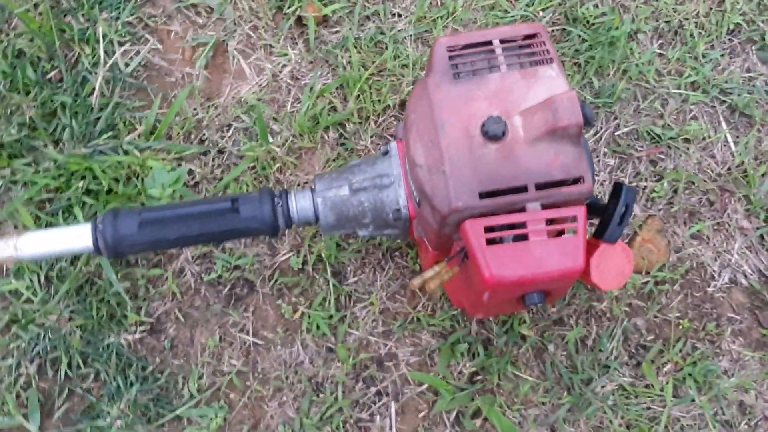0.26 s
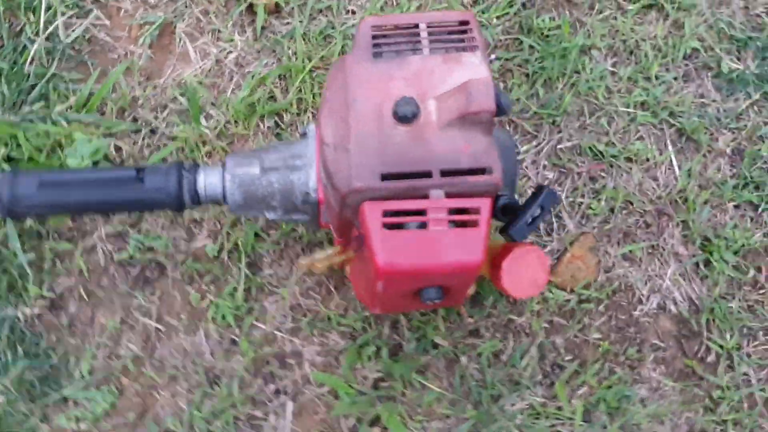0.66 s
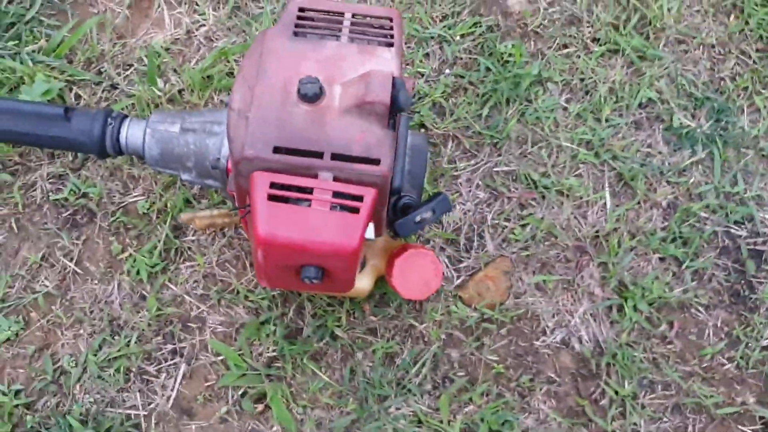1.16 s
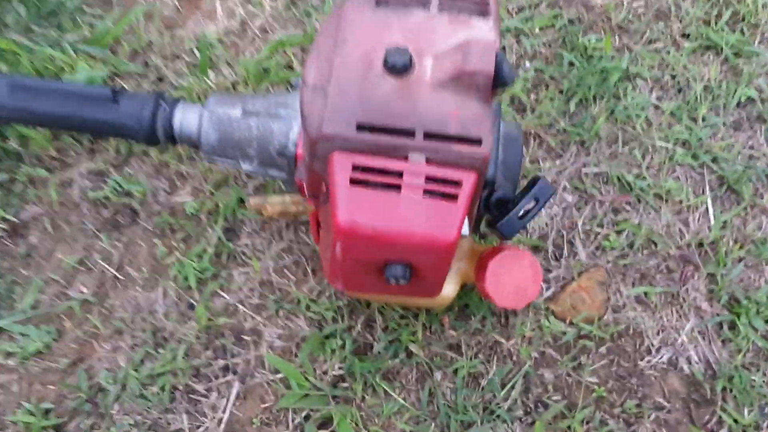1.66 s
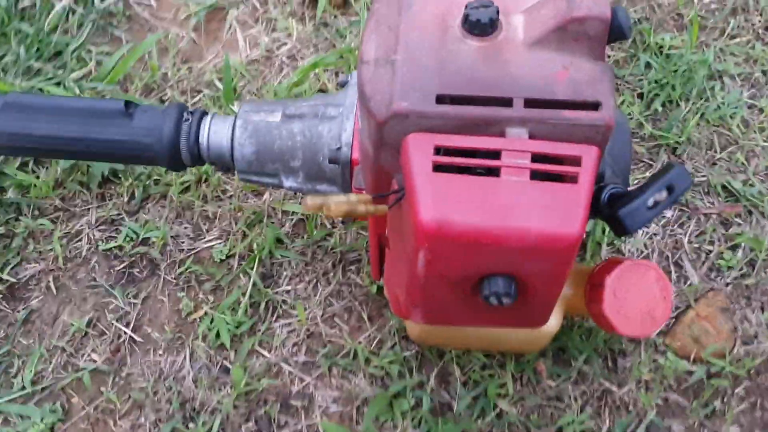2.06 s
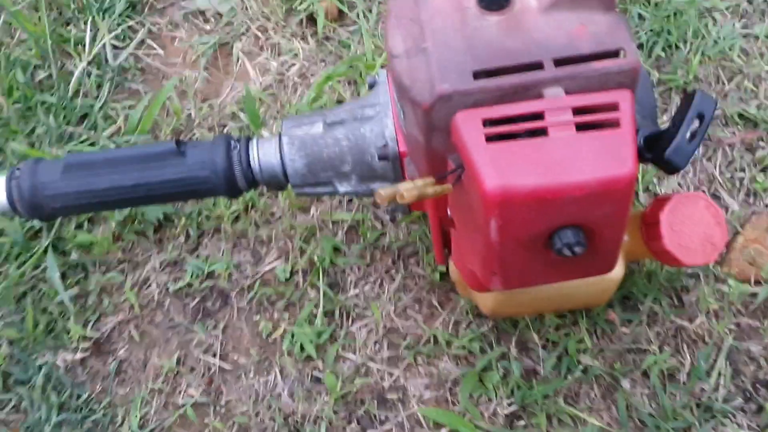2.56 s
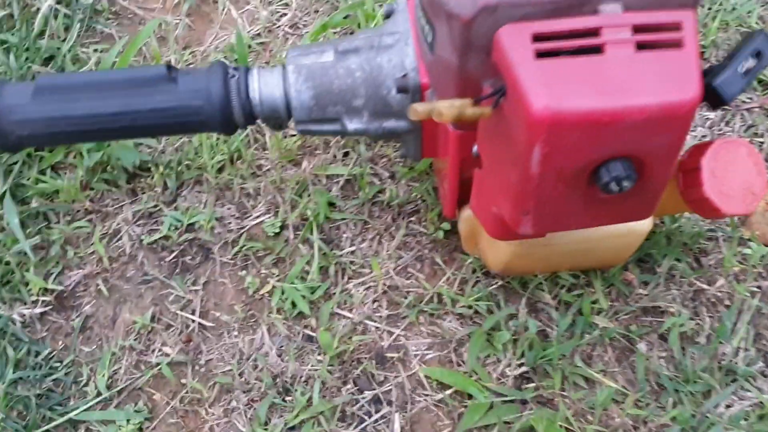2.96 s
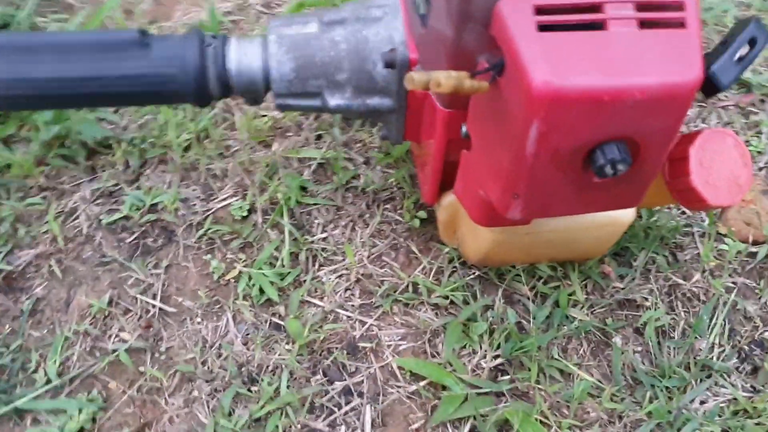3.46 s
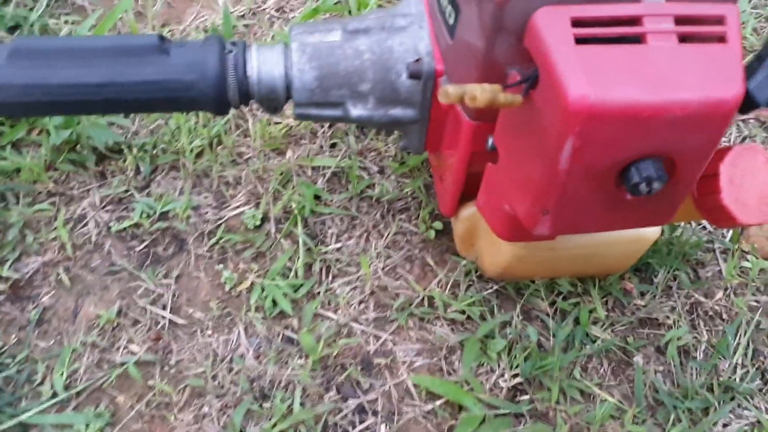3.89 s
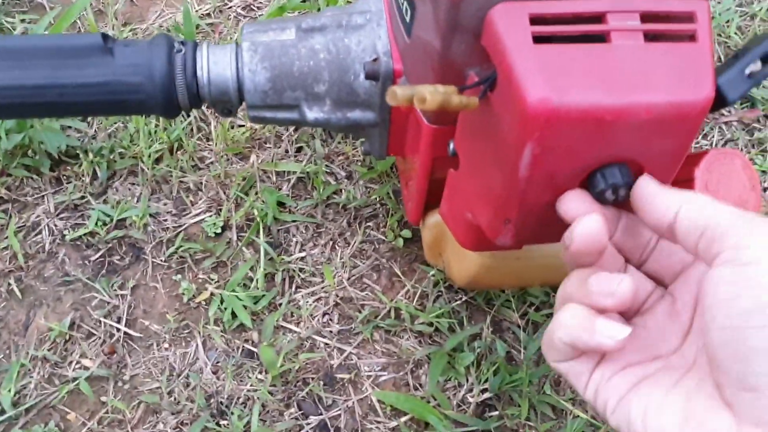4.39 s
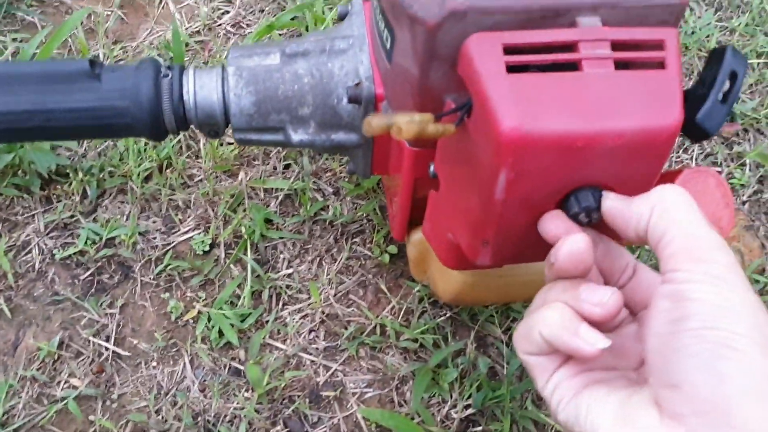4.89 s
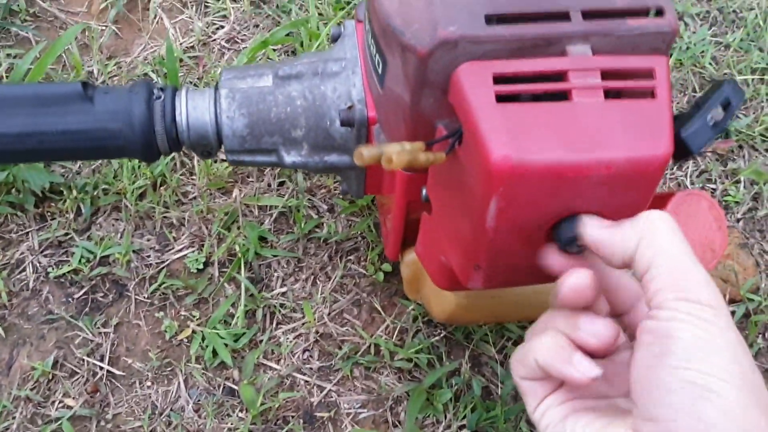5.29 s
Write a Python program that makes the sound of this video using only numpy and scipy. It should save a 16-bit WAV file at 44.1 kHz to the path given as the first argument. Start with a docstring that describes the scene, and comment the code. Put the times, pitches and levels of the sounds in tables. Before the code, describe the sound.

A small two-stroke brush cutter idles on grass outdoors, running from start to end. About 45 soft low exhaust puffs a second form a fluttering purr, while every few turns a charge fires with a hard, cracking pop and brief metallic ring. Fan rasp, piston slap and loose plastic rattle throughout. The handheld stereo microphone moves very close, from above the engine to beside the air filter, making the clatter stronger.

```python
"""Two-stroke brush cutter idling

A small engine idles on the grass while the microphone moves from above its cover to beside the air filter.
Each of about 45 turns a second pumps a soft puff through the muffler, but only every few turns does the
charge fire: a sharp bang that cracks through the casing, rings the cylinder fins and kicks the crank.
Pulses placed turn by turn make the exhaust, decaying sines the fins, and shaped noise the fan, intake,
piston slap, loose cover and shroud. A bounce off the ground colours it all."""
import sys
import numpy as np
from scipy import signal
from scipy.fft import rfft, irfft, next_fast_len
from scipy.io import wavfile

SR = 44100
rng = np.random.default_rng(int(sys.argv[2]) if len(sys.argv) > 2 else 0)


def inscribe(sig):
    """Save sig as 16-bit PCM at rate SR to the path in sys.argv[1].

    A 1-D sig is mono; a 2-D sig holds one channel per row.
    Samples are clipped to [-1, 1] before scaling.
    """
    pcm = np.round(np.clip(np.atleast_2d(sig).T, -1, 1) * 32767)
    wavfile.write(sys.argv[1], SR, pcm.astype(np.int16))


N = 244314
SECONDS = np.arange(N) / SR
IDLE_HZ = 45.3  # nominal crank turns per second


def amp(db):
    """Decibels to gain."""
    return 10 ** (np.asarray(db) / 20)


def unit(x):
    """Scale to rms 1."""
    return x / np.sqrt(np.mean(x ** 2) + 1e-20)


def along(points, hz):
    """Read (frequency, value) points on a log frequency axis."""
    f, v = np.transpose(points)
    return np.interp(np.log(hz + 1), np.log(f + 1), v)


def filtered(x, response):
    """Multiply the spectrum of x by a response given as a function of frequency."""
    size = next_fast_len(N + SR // 2)
    return irfft(rfft(x, size) * response(np.fft.rfftfreq(size, 1 / SR)), size)[..., :N]


def strike(times, sizes, shape):
    """Place one scaled copy of a shape at each time."""
    # a second of lead-in leaves room for times before zero
    train = np.bincount(np.round(times * SR).astype(int) + SR, sizes, N + SR)
    return signal.fftconvolve(train, shape)[SR:SR + N]


def burst(t, attack, t60):
    """An envelope that rises from t = 0 and dies away by 60 dB in t60 seconds."""
    t = np.maximum(t, 0)
    return (1 - np.exp(-t / attack)) * amp(-60 * t / t60)


# Likeness of the two channels of every noise: (frequency [Hz], left-right correlation [-1 to 1])
STEREO_LIKENESS = [(40, 1), (200, 1), (1000, 0.84), (2000, 0.98), (4000, 0.24), (8000, 0.15), (14000, 0.17)]


def noise(spectrum):
    """Stereo noise of rms 1, alike in the bass and mostly unrelated in the high treble."""
    def mid_side(hz):
        angle = np.arccos(np.clip(along(STEREO_LIKENESS, hz), -1, 1)) / 2
        return amp(along(spectrum, hz)) * [np.cos(angle), np.sin(angle)]

    mid, side = filtered(rng.standard_normal((2, N)), mid_side)
    return unit(np.array([mid + side, mid - side]))


# The microphone's move: (time [s], puff level [dB], clatter level [dB],
# nearness to the air filter [0-1], extra path of the ground bounce [m])
MICROPHONE_MOVE = [(0, -1.5, -2, 0.38, 0.31), (1.2, -1.5, -1, 0, 0.18), (1.8, 1, 0, 0, 0.22),
                   (2.1, 1.5, 1, 0.73, 0.21), (2.6, -1.5, 2, 0.92, 0.14), (3.3, 0.5, 2.5, 0.97, 0.15),
                   (3.9, -0.5, 1.5, 0.99, 0.13), (4.6, 0, 2, 0.96, 0.19), (5.5, -0.6, 2.5, 1, 0.13)]


def microphone(times):
    """Puff level, clatter level, nearness and extra ground path at these times."""
    s, *columns = np.transpose(MICROPHONE_MOVE)
    return [np.interp(times, s, column) for column in columns]


# Firings at set times, hard and ordinary: (time [s], hardness over a 0 dB firing [dB])
TIMED_FIRINGS = [(0.2113, 5.5), (0.2764, 6.5), (0.5195, 2), (0.5885, 7.5), (0.6553, 4), (0.945, 7),
                 (1.0308, 5), (1.3632, 8.5), (1.4508, 10), (1.5326, 6.5), (1.9271, 3.5), (2.065, 4.5),
                 (2.1379, 7), (2.2317, 9), (2.3187, 10.5), (2.426, 3), (2.7764, 9.5), (3.0379, 2.5),
                 (3.3475, 8), (3.4305, 8), (3.4946, 6), (3.6987, 6), (3.7848, 9.5), (4.0512, 6),
                 (4.4515, 11.5), (4.5547, 6.5), (4.7956, 8.5), (4.9002, 10), (5.005, 3), (5.332, 8),
                 (5.5045, 5.5)]
# How well the cold mixture burns, with two stumbles: (time [s], mean hardness of the other firings [dB])
MIXTURE_QUALITY = [(0.14, -11), (0.37, 3), (0.88, 0), (1.29, -37), (1.7, 0), (1.8, 6.5), (2.72, 5),
                   (2.95, -20), (3.1, 9), (3.62, -3), (3.95, -1.5), (4.4, 9.5), (5.5, 6)]
# turns a fresh charge needs, its growth per second as the engine warms, turns before the first timed firing
FLUSH_TURNS, FLUSH_TURNS_PER_S, COAST_TURNS = 3.13, .13, 9


def ignite(scatter_db, bang_share, bang_offset_db):
    """Firings as (time [s], bang [dB], ring [dB]): a charge lights once enough turns flush the cylinder."""
    rows, start = [], TIMED_FIRINGS[0][0] - COAST_TURNS / IDLE_HZ
    for end, timed_db in TIMED_FIRINGS:
        turns = round((end - start) * IDLE_HZ)
        charges = max(1, round(turns / (FLUSH_TURNS + FLUSH_TURNS_PER_S * start)))
        lit = np.ceil(np.arange(1, charges) * turns / charges - .5)  # nearest whole turn
        times = start + (end - start) * lit / turns
        hardness = np.interp(times, *np.transpose(MIXTURE_QUALITY))
        hardness = hardness + scatter_db * rng.standard_normal(len(times))
        rows += [*zip(times, hardness), (end, timed_db)]
        start = end
    s, ring_db = np.transpose(rows)
    return np.transpose([s, bang_offset_db + bang_share * ring_db, ring_db])


def crank(firings, slowing):
    """Times of all turns and which fire: after each kick the crank coasts, each turn a little longer."""
    fired = firings[:, 0]
    # four turns lead in to the first firing and four follow the last
    kicks = np.r_[fired[0] - 4 / (IDLE_HZ + 3), fired, fired[-1] + 4 / IDLE_HZ]
    turns = []
    for start, end in zip(kicks, kicks[1:]):
        lengths = 1 + slowing * np.arange(max(1, round((end - start) * IDLE_HZ)))
        turns.extend(start + (end - start) * (np.cumsum(lengths) - lengths) / lengths.sum())
    return np.array(turns), np.isin(turns, fired)


def crank_angle(turns):
    """Crank position at every sample, counted in turns."""
    return np.interp(SECONDS, turns, np.arange(len(turns)))


def rumble():
    """Turbulent gas adds a faint low rush."""
    # (frequency [Hz], relative level [dB])
    rush = [(20, -35), (35, -15), (50, -6), (110, 0), (200, 0), (400, -7), (800, -20), (3000, -60)]
    return amp(-34) * noise(rush)


# Narrow resonances of the shroud: (frequency [Hz], relative level [dB per Hz])
SHROUD_TONES = [(2900, -45), (3200, -16), (3279, 0), (3360, -16), (3520, -28), (3700, -16), (3758, 2),
                (3820, -16), (4200, -45)]


def shroud(shroud_db):
    """Constant vibration keeps the engine shroud singing faintly: noise in narrow bands."""
    return amp(shroud_db) * noise(SHROUD_TONES)


def shake(turns, shake_db, lag):
    """The unbalanced piston rocks the whole machine: one sine cycle per turn, lag in turns."""
    return amp(shake_db) * np.sin(2 * np.pi * (crank_angle(turns) - lag))


# Clatter colour from above the cover: (frequency [Hz], relative level [dB per Hz])
CLATTER_ABOVE = [(100, 4), (400, 10.5), (800, -2), (1060, 7), (1500, -2.5), (1870, 6), (2800, 0),
                 (3750, 2.5), (5000, -0.5), (7400, -1), (8050, 3), (9300, -15), (12000, -13), (15500, -26)]
# Clatter colour from beside the air filter: (frequency [Hz], relative level [dB per Hz])
CLATTER_BESIDE = [(100, 18.5), (400, 4.5), (850, 2), (1350, 9), (1600, -0.5), (2000, 4), (2700, 0.5),
                  (4300, 6), (5100, -2.5), (6700, -1), (7350, 3), (9600, -15), (10900, -10), (15500, -30)]
# Rise and fall of the rasp within one turn: (share of the turn [0-1], level [dB])
RASP_TURN = [(0, 4.5), (.1, 1), (.22, -2.5), (.35, -4.5), (.42, 1.5), (.55, 4.5), (.75, 2.5), (.88, 1.5),
             (1, -6.5)]


def clatter(turns, clatter_db, uneven_db, slap_db, slap_t60, tick_db, tick_t60, count=800):
    """Fan and intake rasp with the crank, the piston slaps once a turn, loose parts tick at random."""
    angle = crank_angle(turns)
    _, level_db, near, _ = microphone(SECONDS)
    near = np.clip(near, 0, 1)

    knots = np.linspace(0, len(turns), 6 * len(turns))  # about six random levels a turn
    uneven = np.interp(angle, knots, rng.standard_normal(len(knots)))
    rasp = amp(np.interp(angle % 1, *np.transpose(RASP_TURN)) + uneven_db * uneven)

    t = SECONDS[:SR // 20]
    late, force = rng.standard_normal((2, len(turns)))
    slap_times = turns + 0.00637 + 0.00027 * late
    slaps = strike(slap_times, amp(slap_db + 0.37 * force), burst(t, 0.0002, slap_t60))

    tick_sizes = amp(tick_db) * amp(4 * rng.standard_normal(count))
    ticks = strike(rng.uniform(0, N / SR, count), tick_sizes, burst(t, .0001, tick_t60))

    colour = np.sqrt(1 - near) * noise(CLATTER_ABOVE) + np.sqrt(near) * noise(CLATTER_BESIDE)
    return amp(clatter_db + level_db) * np.hypot(rasp, slaps + ticks) * colour


# The loose cover's resonance: (frequency [Hz], relative level [dB per Hz])
COVER_BUZZ = [(2800, -56), (3400, -13), (3530, 6), (3620, 4.5), (3760, -6), (4500, -64)]


def cover(firings, cover_db, hardness, delay, attack, t60):
    """Hard firings shake the loose cover, whose narrow-band buzz lasts into the next turn."""
    s, _, ring_db = firings.T
    shape = burst(np.arange(SR // 5) / SR, attack, t60)
    return strike(s + delay, amp(cover_db + hardness * ring_db), shape) * noise(COVER_BUZZ)


# The crack of the blow: (frequency [Hz], relative level [dB per Hz])
CRACK_COLOUR = [(300, -6), (1200, 0.5), (2500, 7), (3100, -3.5), (5000, 0.5), (6500, 5.5), (8600, 3.5),
                (9300, -4.5), (11000, -7), (13500, -3), (15500, -7.5)]


def crack(firings, crack_db, t60, hardness, snap_db, snap_t60, rebound, rebound_db, rebound_t60):
    """The blow cracks through the casing; the piston slaps back before the bottom of its stroke."""
    s, _, ring_db = firings.T
    t = np.arange(SR // 10) / SR
    snap = amp(snap_db) * burst(t, 0.00052, snap_t60)
    body = burst(t, 0.00092, t60)
    slap_back = amp(rebound_db) * burst(t - rebound, 0.00094, rebound_t60)
    sizes = amp(crack_db + hardness * ring_db)
    return strike(s, sizes, snap + body + slap_back) * noise(CRACK_COLOUR)


# Ringing modes of the cylinder fins: (frequency [Hz], mean level [dB], t60 [s])
FIN_MODES = [(1870, -6.5, 0.011), (2592, 0.5, 0.0071), (5790, -24, 0.036), (6360, -29, 0.053),
             (6580, -11, 0.027), (6940, -0.5, 0.03), (7350, -14, 0.047), (8170, -19, 0.03),
             (8660, -18, 0.029), (11850, -25, 0.03), (13800, -16, 0.033), (14750, -39, 0.023)]


def fins(firings, ring_db, scatter_db, detune, attack, delay, port_phase):
    """Each firing rings the fins at new strengths and pitches; the two ports hear them out of step."""
    out, t = np.zeros((2, N + SR)), np.arange(SR // 10) / SR
    hz, db, t60 = np.transpose(FIN_MODES)[:, :, None]
    port_offset = port_phase * np.array([1, 0])[:, None, None]  # radians, left port only
    for s, _, blow_db in firings:
        level, drift = rng.standard_normal((2, len(FIN_MODES), 1))
        phase = rng.uniform(0, 2 * np.pi, (len(FIN_MODES), 1)) + port_offset
        tones = np.sin(2 * np.pi * hz * (1 + detune * drift) * t + phase)
        modes = amp(db + scatter_db * level) * burst(t, attack, t60) * tones
        out[:, round((s + delay) * SR):][:, :len(t)] += amp(ring_db + blow_db) * modes.sum(axis=1)
    return out[:, :N]


def shaded(x, shade_db, open_db, edge_hz):
    """The filter box hides the highest ring of the cylinder as the microphone moves beside it."""
    top = filtered(x, lambda hz: 1 - 1 / (1 + (hz / edge_hz) ** 12))
    near = microphone(SECONDS)[2]
    return x - top + top * amp(open_db + shade_db * near)


def smoulder(turns, fires, smoulder_db, per_turn_db, stumble, scatter_db):
    """Burn of unfired charges (gain): grows each turn since a firing, and when the mixture is poor."""
    index = np.arange(len(turns))
    waited = index - np.maximum.accumulate(index * fires)
    poor_db = np.maximum(0, -np.interp(turns, *np.transpose(MIXTURE_QUALITY)))
    burn_db = smoulder_db + per_turn_db * waited + stumble * poor_db
    return np.minimum(amp(burn_db + scatter_db * rng.standard_normal(len(turns))), .5)


def pulse(spectrum, lag_hz, size=8192):
    """The causal pressure pulse of this spectrum; the baffles hold back what lies below lag_hz."""
    hz = np.fft.rfftfreq(size, 1 / SR)
    # folding the cepstrum gives minimum phase
    cepstrum = irfft(np.log(amp(along(spectrum, hz))))
    cepstrum[1:size // 2] *= 2
    cepstrum[size // 2 + 1:] = 0
    baffles = (1j * hz - lag_hz) / (1j * hz + lag_hz)  # all-pass
    return irfft(np.exp(rfft(cepstrum)) * baffles)[:size // 2]


# An unfired stroke through the muffler: (frequency [Hz], relative level [dB])
PUFF_SPECTRUM = [(20, 37), (45, -0.5), (75, 28.5), (105, 29), (140, 30), (185, 36.5), (245, 27.5),
                 (350, 23), (480, 8), (570, 15), (700, 8.5), (1100, 7), (2000, -39), (5000, -58)]
# A fired stroke through the muffler: (frequency [Hz], relative level [dB])
BANG_SPECTRUM = [(20, 15.5), (50, 22), (95, 36.5), (190, 30), (280, 30.5), (340, 24.5), (460, 24),
                 (700, 21), (850, 9), (1000, 11.5), (1170, 21.5), (1620, 8.5), (1950, -3), (2700, 5),
                 (5000, -11)]


def exhaust(firings, turns, fires, embers, scatter_db, jitter, puff_db, bang_db, gulp, gulp_db,
            can_hz, can_width_hz):
    """An unfired turn sucks, then puffs; the better the charge burns, the more a bang takes its place."""
    late, force = rng.standard_normal((2, len(turns)))
    burn = embers.copy()  # misfires still smoulder a little
    burn[fires] = amp(firings[:, 1])
    times = turns + ~fires * (.0009 + jitter * late)  # unfired strokes come late and unsteadily
    size = amp(microphone(turns)[0] + scatter_db * force)

    puff = -pulse(PUFF_SPECTRUM, lag_hz=150)
    puffs = strike(times - .002, size * np.clip(1 - burn, 0, 1), puff)
    gulps = strike(times + gulp, size * amp(gulp_db), puff)  # the intake gulps later in each turn
    bangs = strike(times - .0004, burn, pulse(BANG_SPECTRUM, lag_hz=100))

    def can(hz):
        return can_hz ** 2 - hz ** 2 + 1j * hz * can_width_hz

    # all-pass: the muffler can holds its own resonance back for about a millisecond
    bangs = filtered(bangs, lambda hz: np.conj(can(hz)) / can(hz))
    return amp(puff_db) * (puffs + gulps) + amp(bang_db) * bangs


# Moving hollow in the exhaust's tone: (time [s], centre frequency [Hz])
HOLLOW_GLIDE = [(0, 550), (1.6, 535), (1.85, 600), (2.1, 680), (2.45, 780), (3.2, 900)]


def hollow(x, depth, width_hz):
    """Two paths from the muffler partly cancel in a narrow band that moves with the microphone."""
    hz = np.interp(SECONDS, *np.transpose(HOLLOW_GLIDE))
    carrier = np.exp(2j * np.pi * np.cumsum(hz) / SR)
    pole = np.exp(-np.pi * width_hz / SR)
    # shift the band to zero, low-pass it, shift it back
    band = 2 * np.real(carrier * signal.lfilter([1 - pole], [1, -pole], x / carrier))
    return x - np.clip(depth, 0, 1) * band


def ground(x, bounce_db, grass_hz):
    """The bounce off the ground, dulled by grass, cuts notches that move as its extra path changes."""
    delay = microphone(SECONDS)[3] / 343  # speed of sound in m/s
    dull = filtered(x, lambda hz: amp(bounce_db) / np.hypot(1, hz / grass_hz))
    return np.array([np.interp(SECONDS - delay, SECONDS, port) for port in dull])


# Treble tilt between the ports: (frequency [Hz], left over right [dB])
PORT_TILT = [(350, 0), (700, -1.7), (1200, 3.3), (2400, 3.3), (4400, 3.5), (7000, 6.7), (8500, 5),
             (11000, -3), (13500, -9)]


def ports(x):
    """The right port hears the engine a moment sooner; the case tilts the treble from side to side."""
    lag = 2.5 / SR  # seconds
    def response(hz):
        tilt = amp(np.outer([.5, -.5], along(PORT_TILT, hz)))
        return tilt * np.exp(np.outer([-1j, 1j], np.pi * hz * lag))

    return filtered(x, response)


def scene():
    """The whole engine, heard directly and off the ground; plain times and t60 are in seconds."""
    firings = ignite(scatter_db=2.0, bang_share=0.13, bang_offset_db=0.4)
    turns, fires = crank(firings, slowing=.03)
    embers = smoulder(turns, fires, smoulder_db=-33.5, per_turn_db=4.5, stumble=0.59, scatter_db=3)

    background = rumble() + shroud(shroud_db=-46)
    works = clatter(turns, clatter_db=-31, uneven_db=3.5, slap_db=3.5, slap_t60=0.032,
                    tick_db=-6.5, tick_t60=0.0051)
    buzz = cover(firings, cover_db=-29, hardness=1.0, delay=0.0011, attack=0.0041, t60=0.077)
    blows = crack(firings, crack_db=-16, t60=0.03, hardness=0.28, snap_db=-2.5, snap_t60=0.0069,
                  rebound=0.0085, rebound_db=-15, rebound_t60=0.01)
    metal = fins(firings, ring_db=-13.3, scatter_db=2, detune=0.013, attack=0.0018, delay=0.00032,
                 port_phase=1.0)
    metal = shaded(metal + blows, shade_db=-6.5, open_db=2.0, edge_hz=9500)
    gas = exhaust(firings, turns, fires, embers, scatter_db=1.27, jitter=0.00045, puff_db=-0.8, bang_db=-2,
                  gulp=0.01334, gulp_db=-22.5, can_hz=1374, can_width_hz=470)
    gas = hollow(gas, depth=0.46, width_hz=74) + shake(turns, shake_db=-48, lag=0.083)

    engine = background + works + buzz + metal + gas
    return ports(engine + ground(engine, bounce_db=-18.5, grass_hz=1130))


def record(dry):
    """The microphone chain cuts the deepest bass, rounds off high peaks and ends steeply at 15.9 kHz."""
    thin = filtered(dry, lambda hz: 1 - 1 / (1 + (hz / 36.5) ** 11))
    held = thin / (1 + np.abs(thin) ** 8) ** (1 / 8)
    return filtered(held, lambda hz: 1 / (1 + (hz / 15900) ** 120))


dry = scene()
out = record(dry)
inscribe(out)
```